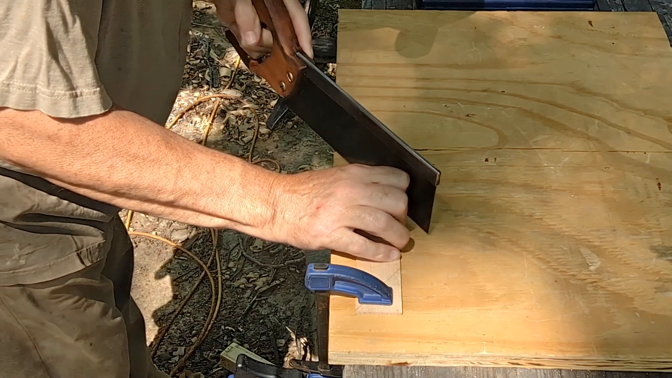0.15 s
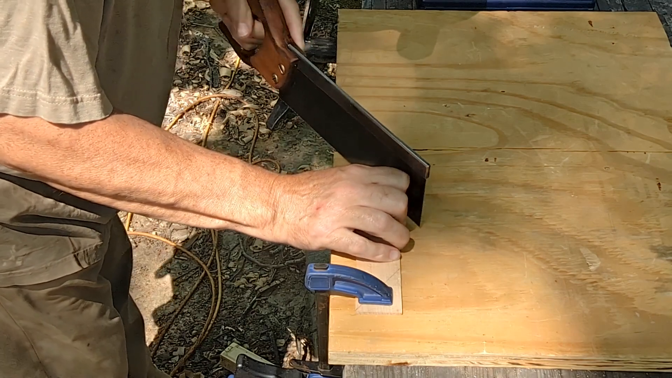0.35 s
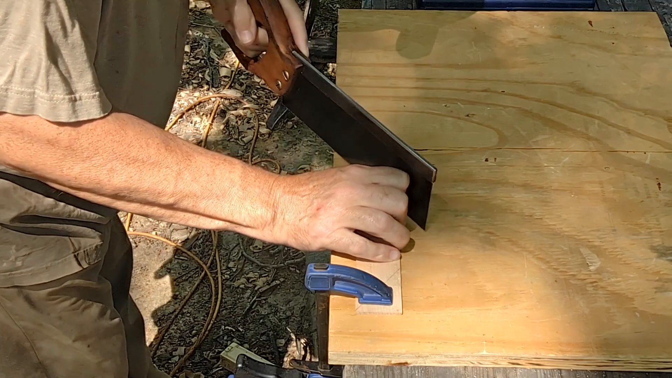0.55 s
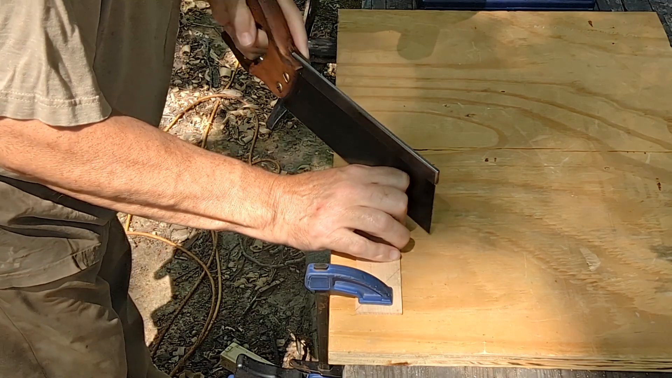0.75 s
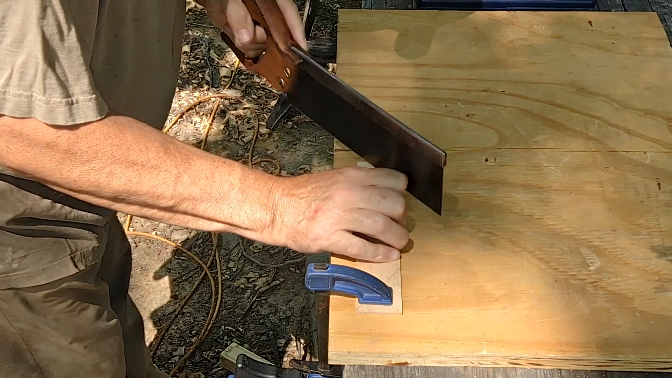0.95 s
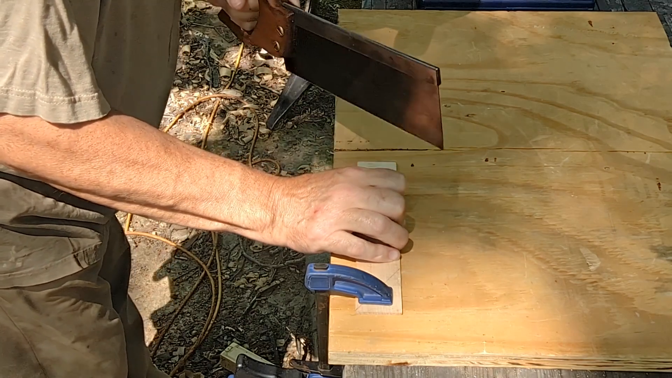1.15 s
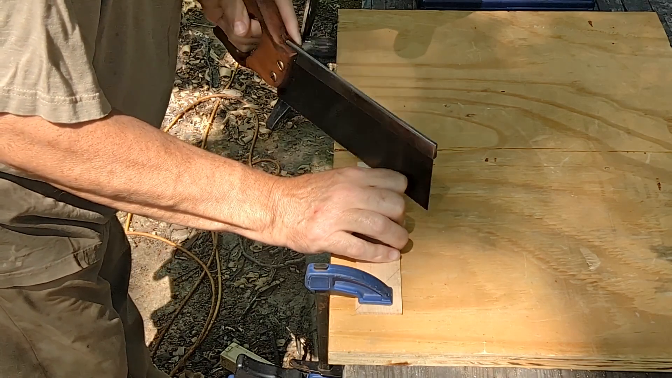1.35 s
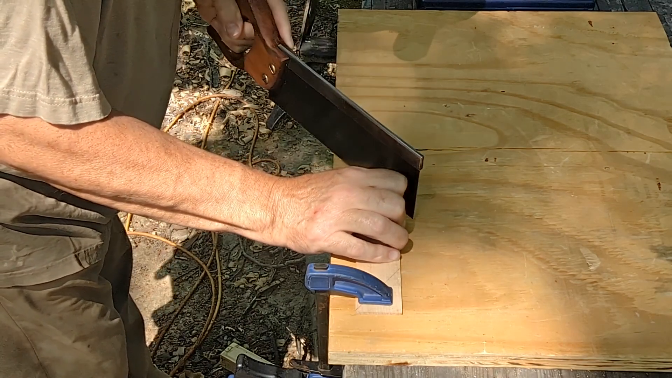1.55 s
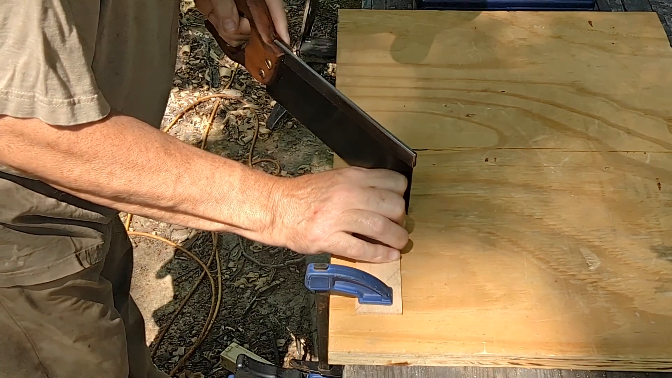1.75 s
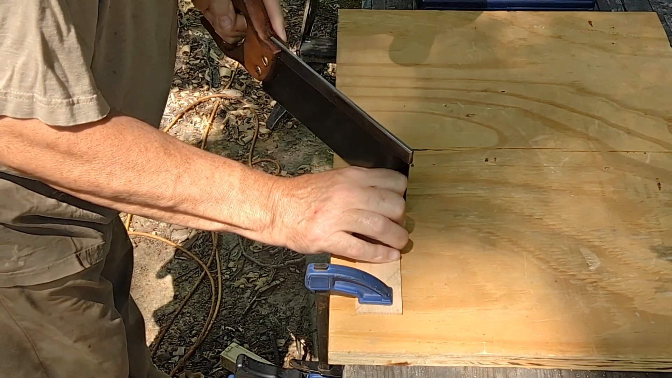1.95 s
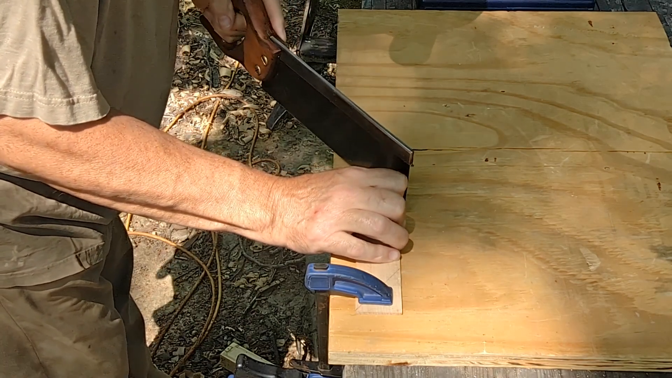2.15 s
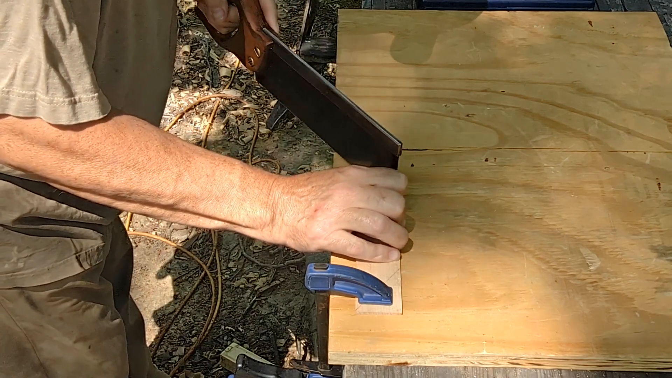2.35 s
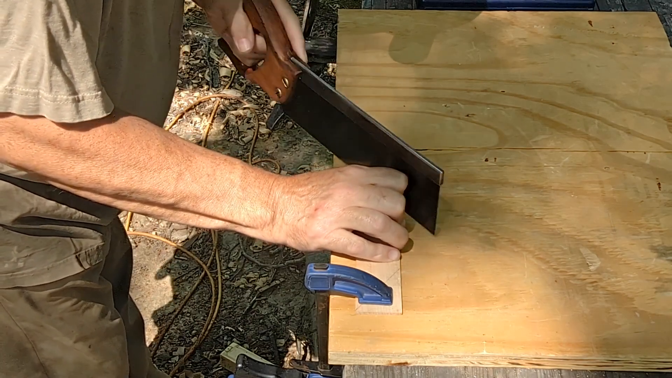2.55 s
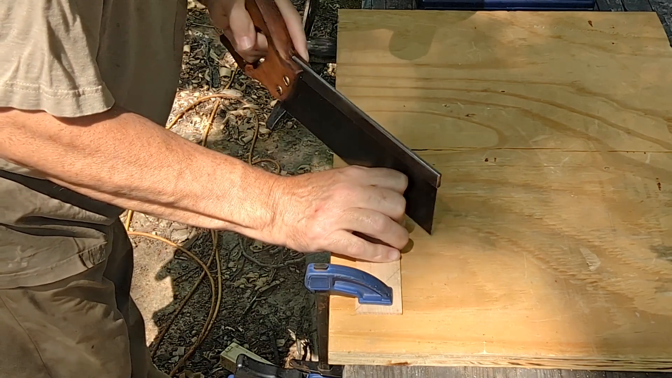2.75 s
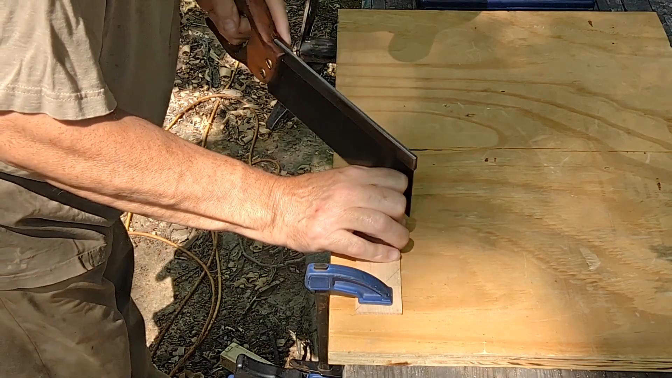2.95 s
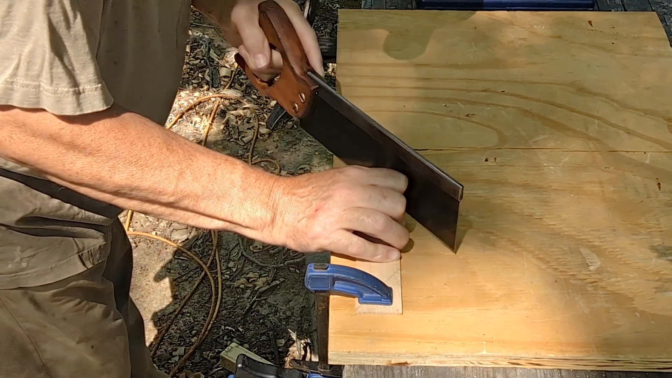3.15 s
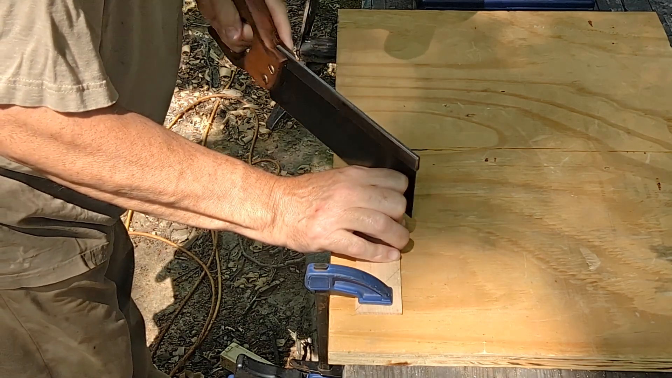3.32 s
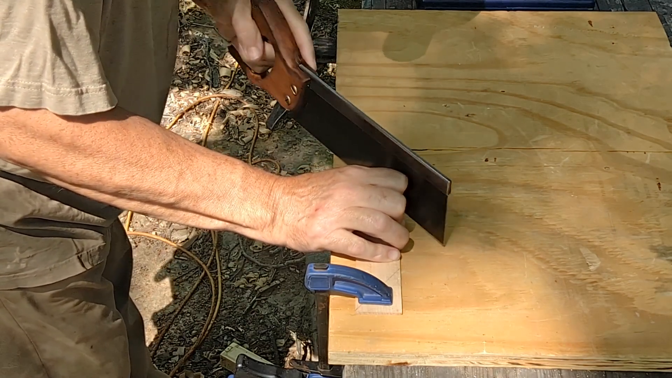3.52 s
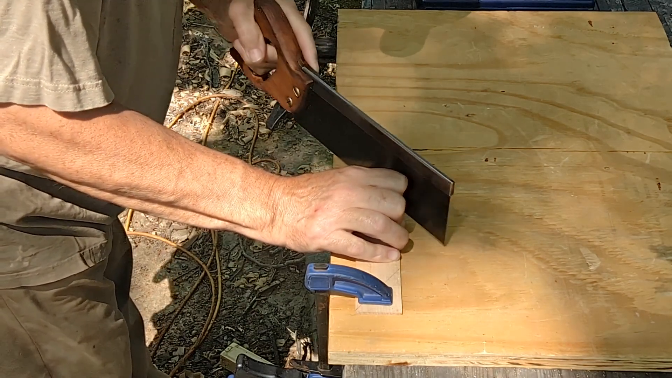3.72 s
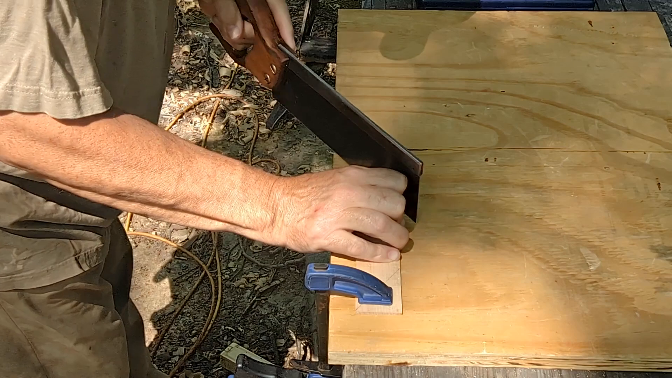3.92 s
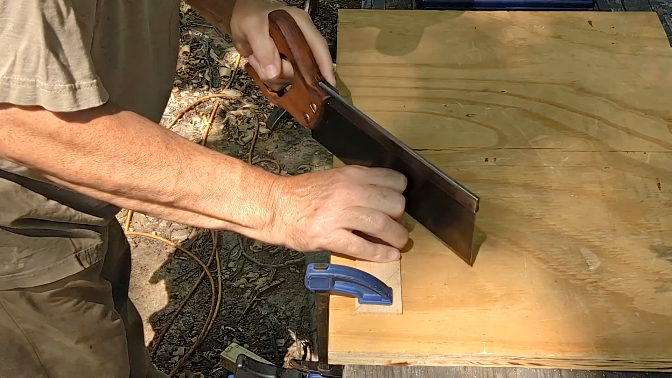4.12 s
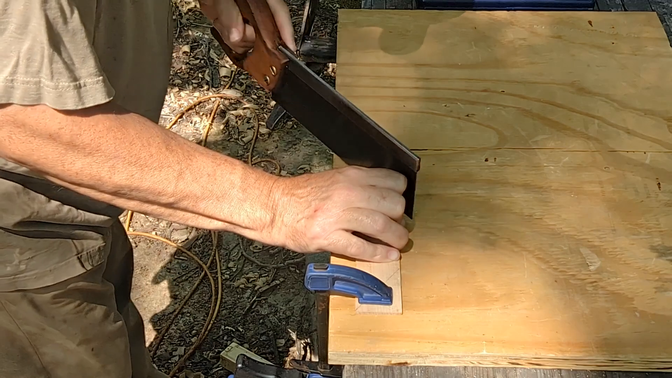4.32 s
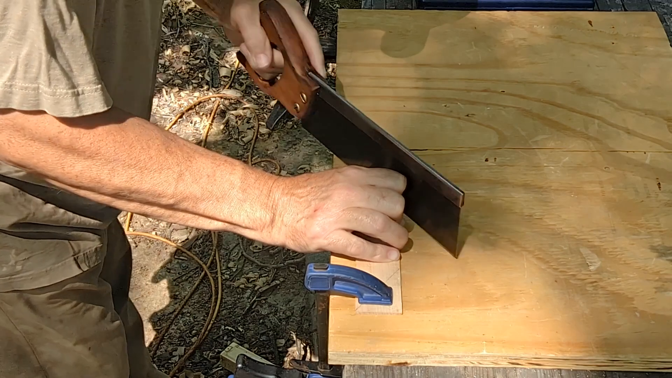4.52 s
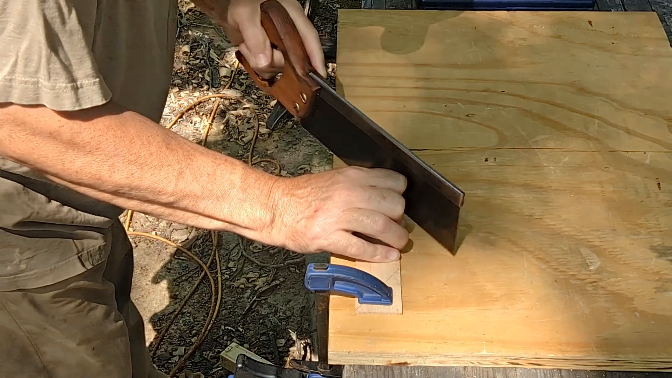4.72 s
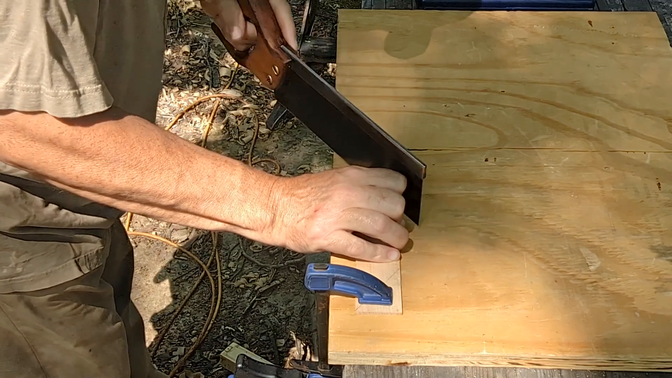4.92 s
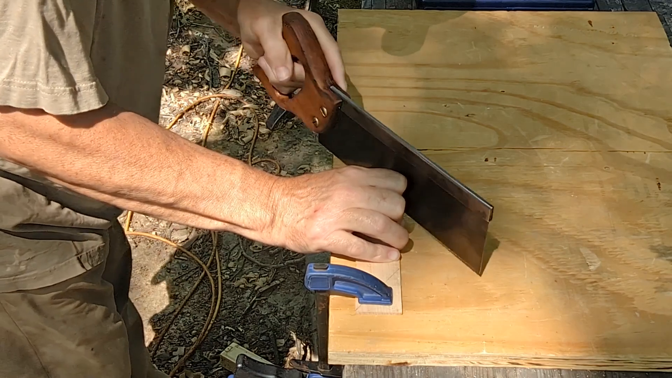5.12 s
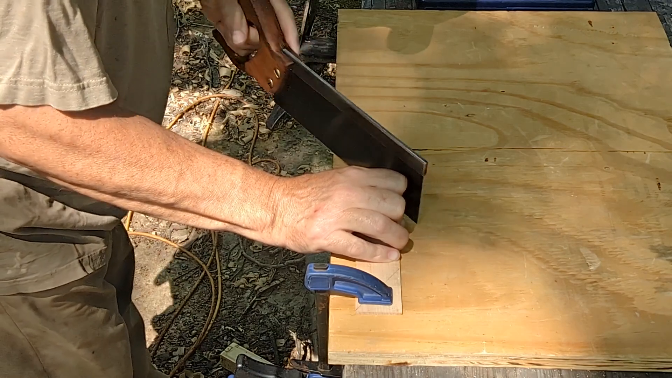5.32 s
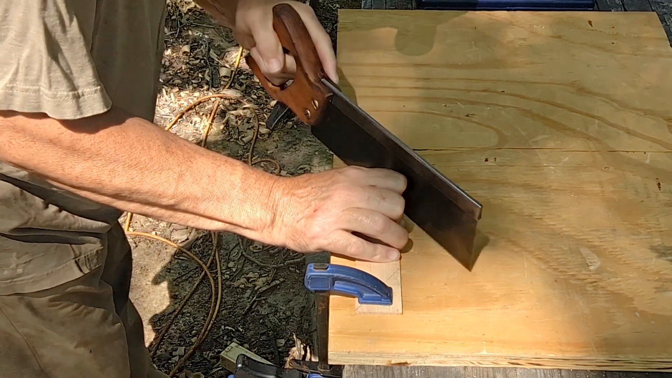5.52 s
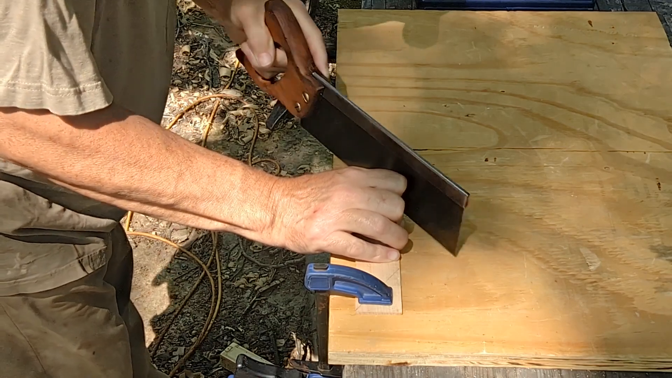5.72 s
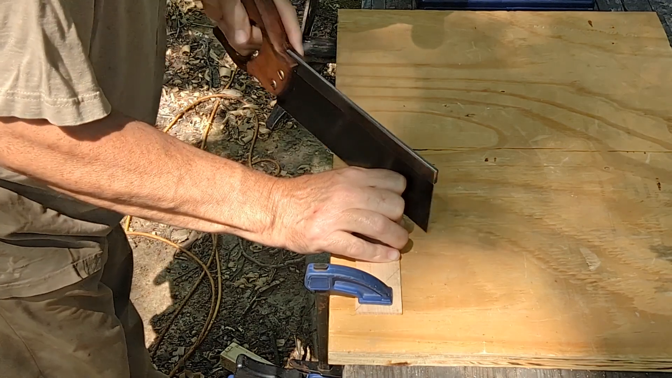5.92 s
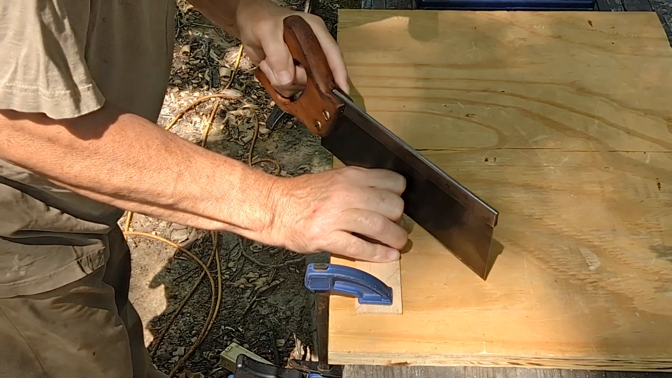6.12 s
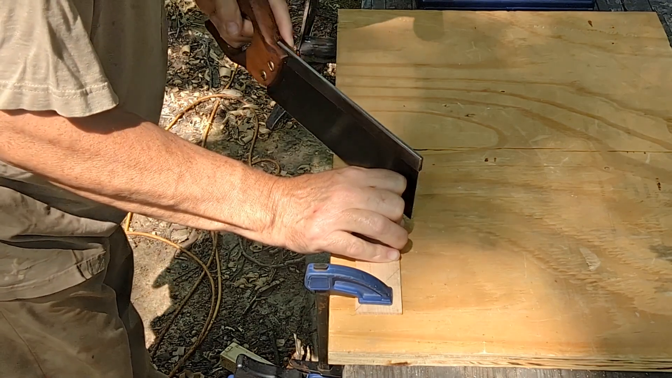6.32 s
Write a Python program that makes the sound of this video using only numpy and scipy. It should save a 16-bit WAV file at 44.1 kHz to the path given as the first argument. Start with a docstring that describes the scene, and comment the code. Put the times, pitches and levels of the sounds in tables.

```python
"""A fine-toothed back saw cuts a thin strip of wood clamped to a plywood bench, outdoors.
Its teeth catch and tear fibres at the pace of the arm, and this force drives the resonances of strip,
bench and blade, harder on the push than on the pull, close to a two-port microphone.
In a pause the saw is set back with a few knocks. Behind it a cicada swells, a bird whistles and
something rumbles far off, under an open-air hush."""
import sys
import numpy as np
from scipy import signal
from scipy.fft import rfft, irfft, next_fast_len
from scipy.io import wavfile
from scipy.ndimage import uniform_filter1d

SR = 44100
rng = np.random.default_rng(int(sys.argv[2]) if len(sys.argv) > 2 else 0)


def dump(signal):
    """Clip the signal to [-1, 1] and save it as 16-bit WAV at the path in sys.argv[1]."""
    limited = np.clip(np.atleast_2d(signal).T, -1, 1)
    pcm = np.round(limited * 32767).astype(np.int16)
    wavfile.write(sys.argv[1], SR, pcm)


N = 280917
T = np.arange(N) / SR
FFT_SIZE = 2 * next_fast_len(N // 2 + SR // 4)
HZ = np.arange(FFT_SIZE // 2 + 1) * SR / FFT_SIZE

# Forward and return strokes. Each row: start and end in seconds, point of greatest effort from 0 to 1,
# bite in dB, then low notes, blade rasp and tooth hiss in dB relative to the bite, bench shudder in dB.
PUSHES = [(-0.053, 0.141, 0.53, -41.0, -0.5, 1, -4.5, -41.5),
          (0.281, 0.513, 0.61, -37.0, -4.5, -0.5, -6.5, -39.5),
          (0.671, 0.891, 0.57, -32.5, -5.5, -3, -7.5, -36),
          (2.399, 2.694, 0.66, -34.0, -4.0, 0.5, -5.5, -45.5),
          (2.923, 3.2, 0.5, -31.5, -5, -1.5, -6, -41.5), (3.395, 3.691, 0.47, -32.5, -2.5, -1, -5.5, -43),
          (3.911, 4.191, 0.38, -31.0, -2, 0, -3, -47.5), (4.396, 4.691, 0.45, -31.5, -4.5, -0.5, -3, -44),
          (4.905, 5.196, 0.44, -29, -2, -1, -3.5, -43.5), (5.395, 5.682, 0.52, -30, -3.5, -0.5, -3, -41.5),
          (5.889, 6.176, 0.5, -29.0, -4, -1.5, -3.5, -43.5)]
PULLS = [(0.108, 0.335, 0.49, -44, 1.5, -1, -7, -41.5), (0.496, 0.722, 0.39, -41.5, 1, -1.5, -7.5, -36),
         (2.207, 2.387, 0.49, -52.5, 1.5, -3.5, -8, -51.5), (2.703, 2.975, 0.37, -43, 3.5, 2, -6, -40.5),
         (3.188, 3.448, 0.45, -38.5, 1, 2.0, -7, -58), (3.691, 3.94, 0.4, -39.5, -1, 4, -3, -49),
         (4.161, 4.464, 0.43, -38.5, -2, 2.0, -3, -46.5), (4.673, 4.956, 0.44, -38, -4, 2.0, -2.5, -46),
         (5.169, 5.446, 0.53, -37.5, -2, 4, -1.5, -45), (5.653, 5.936, 0.52, -37.0, -5, 4, -0.5, -40.5),
         (6.127, 6.432, 0.47, -35.5, -1, 1.5, -2.5, -39.5)]
# Teeth snagging on hard grain. Each row: time in seconds, half length in seconds, extra bite in dB.
SNAGS = [(0.411, .012, 4), (0.8, 0.012, 4), (2.534, 0.0018, 3.5), (2.601, 0.021, 4.5), (3.07, .03, 1.5),
         (3.377, 0.011, 3), (3.773, 0.0094, 3), (4.09, 0.017, 4), (4.223, .002, 3), (5.112, 0.014, 3.5),
         (5.333, .002, 5.5), (5.596, 0.015, 2), (5.98, .002, 3), (6.087, .014, 1)]
# Modes of strip, bench and blade. Each row: frequency in Hz, bandwidth in Hz, peak height in dB.
MODES = [(272.8, 27.6, 10.5), (437.6, 40, 10), (544.8, 50.5, 10.5), (651.3, 46, 9.5), (820, 73, 6.5),
         (1143, 130, 7.5), (1291, 63, 8), (1380, 42, 3.5), (1507, 35, 3.5), (1664, 50, 5), (1900, 40, 0.5),
         (3140, 1400, 3.5), (3670, 140, 1), (6730, 410, 5), (9500, 480, 3.5), (11700, 430, 3),
         (12450, 370, 2)]
# Spectral envelopes of the sawing. Each row: frequency in Hz, relative level in dB.
PUSH_SPECTRUM = [(90, -33), (170, -11.5), (350, -3.5), (750, -1), (960, -5), (1450, -1), (2000, -1),
                 (2500, -5.5), (3200, -23.5), (6000, -27), (15000, -69)]
PULL_SPECTRUM = [(90, -9.5), (170, -15.5), (350, -2.5), (750, 1), (960, -1.5), (1450, 0.5), (2000, 0.5),
                 (2500, -15.5), (3200, -19), (6000, -34), (15000, -49)]
RASP_SPECTRUM = [(500, -72), (1700, -11.5), (2300, -1), (2700, -4), (3300, 4.5), (4000, 3.5), (4500, -5),
                 (5300, -16.5), (8000, -25), (15000, -57.5)]
HISS_SPECTRUM = [(2500, -44.5), (4800, -4.5), (6000, 2.5), (8000, 3.5), (10500, 3.5), (12700, 6.5),
                 (14000, -3), (16000, 1)]
SHUDDER_SPECTRUM = [(25, -60), (45, -17), (65, -15), (85, -0.5), (115, 1), (150, -13), (210, -9.5),
                    (290, -16.5), (400, -19), (1000, -64)]
# Likeness of the tearing at the two ports. Each row: frequency in Hz, shared power from 0 to 1.
COHERENCE = [(200, 0.5), (500, 0.97), (1300, 0.53), (2100, 0.18), (3300, 1), (4300, 0.24), (5200, 0.5),
             (6600, 0.56), (8500, 0.4), (12000, .5), (15000, 0)]
# Balance of the saw between the ports. Each row: frequency in Hz, left minus right in dB.
BALANCE = [(100, -0.9), (270, 0), (480, -1), (1000, 1), (1900, 1.5), (2850, -1.5), (3400, 1.5), (6000, 1),
           (9600, -5), (12000, 5), (13700, 4), (16000, 2)]
# The saw set down on the wood. Each row: time in seconds, relative peak force in dB.
KNOCKS = [(1.589, -43.5), (1.616, -42.5), (1.639, -50), (1.898, -44.5)]
# Cicada swells. Each row: time of the crest in seconds, level in dB.
SWELLS = [(.62, -48), (2.1, -48), (3.42, -49.5), (4.85, -48.5), (6.25, -50)]
# Bird whistles. Each row: start and end in seconds, first and last frequency in Hz, level in dB.
WHISTLES = [(1.96, 2.07, 2735, 2750, -61), (2.08, 2.18, 2755, 2725, -63), (2.04, 2.22, 1840, 1760, -72)]
# Spectral envelopes of the lesser sources. Each row: frequency in Hz, relative level in dB.
KNOCK_SPECTRUM = [(60, -24), (115, 17), (200, 2), (290, 0), (450, -8), (700, 4), (1300, -5), (2500, -17),
                  (3400, -4), (6000, -25), (15000, -40)]
CICADA_SPECTRUM = [(2500, -30), (3300, -15), (3650, -1), (3900, -5), (4250, 1.5), (4750, -1.5), (5250, 1.5),
                   (6100, -7.5), (6950, 1.5), (7700, -9.5), (8800, -10), (10000, -23), (15000, -31)]
HUSH_SPECTRUM = [(60, -6.5), (150, 6.5), (230, -7.5), (300, -1), (550, -5), (1100, -3), (1900, -10.5),
                 (2700, -9), (3600, -5.5), (7000, -5.5), (8500, -14), (13500, -14), (15500, -9)]
RUMBLE_SPECTRUM = [(20, -60), (30, -41), (40, -35), (50, -23), (60, 0.5), (76, -2), (103, 0.5), (130, -12),
                   (190, -23.5), (400, -46.5)]


def saw(motion, spectrum, lift_db, dull_db, bite_db, rasp_db, hiss_db, shudder_db, **cut):
    """Forced vibration: the cutting force drives the modes of wood, blade and tooth tips."""
    progress, lows_db, (bite, rasp, hiss, shudder) = motion
    tearing, zipping = cutting_force(progress, **cut)
    modes_db = sum(db / (1 + (2 * (HZ - hz) / width) ** 2) for hz, width, db in MODES)
    # sawdust fills the gullets, so each stroke ends duller than it starts
    shelf_db = lift_db + lows_db + dull_db * (progress - .5)
    dulled = tearing + (undb(shelf_db) - 1) * weigh(tearing, 1 / (1 + (HZ / 900) ** 4))
    wood = colour((dulled + zipping) * bite, contour(spectrum) + modes_db)
    blade = colour(tearing * rasp, contour(RASP_SPECTRUM) + modes_db)
    tips = colour(tearing * hiss, contour(HISS_SPECTRUM) + modes_db)
    bench = bench_shudder(shudder)
    return undb(bite_db) * wood + undb(rasp_db) * blade + undb(hiss_db) * tips + undb(shudder_db) * bench


def arm(strokes, bite_power, let_go_db, slow_lows_db, hiss_fade_db, shudder_at, shudder_rise_db):
    """Amplitude modulation: the arm's effort rises and falls once a stroke and sets the saw's gains."""
    saturation, grip_db, dig_in_db, sway_db = 0.91, 1.46, 4.5, 0.64
    progress, lows_db, gains = np.zeros(N), np.zeros(N), np.zeros((4, N))
    for start, end, crest, bite_db, low_db, rasp_db, hiss_db, shudder_db in strokes:
        on = (T > start) & (T < end)
        progress[on] = way = (T[on] - start) / (end - start)
        effort = np.sin(np.pi * np.interp(way, [0, crest, 1], [0, .5, 1]))
        pressure = (np.tanh(saturation * effort) / np.tanh(saturation)) ** bite_power
        # the braking teeth grip a little harder and lose treble as they dig in, then let go
        release = np.clip(10 * (way - 0.744), 0, 1)
        bite = pressure * undb(bite_db + grip_db * braking(way) - let_go_db * release)
        treble = bite * undb(-dig_in_db * braking(way))
        hiss = treble * undb(hiss_db - hiss_fade_db * (way - .5))
        lows_db[on] = low_db + slow_lows_db * (1 - effort)  # a slow blade sounds deeper
        # the bench shakes most while the blade's tip is in the cut: earlier on a push than on a pull
        shaking = np.exp(-((way - shudder_at) / 0.22) ** 2)
        shudder = effort ** .75 * undb(shudder_db + shudder_rise_db * (shaking - 1))
        gains[:, on] += [bite, treble * undb(rasp_db), hiss, shudder]
    return progress, lows_db, gains * undb(sway_db * wander(20))  # the hand is unsteady


def braking(progress):
    """Deceleration of the arm: 0 through most of a stroke, rising to 1 near its end."""
    return np.clip((progress - .65) / .15, 0, 1)


def cutting_force(progress, peak_tooth_hz, tooth_db, zip_db, grunt_db, grain_db):
    """Impact and fracture: teeth and fibres give a tearing noise, the tooth rate a rough tonal zip."""
    settled = np.interp(T, [1, 2], [0, 1])  # 0 before the pause, 1 after it
    speed = (.1 + .9 * np.sin(np.pi * progress) ** 2) * (.95 + .05 * settled)
    clicks, phase = teeth(peak_tooth_hz * speed, scatter_db=17)
    snaps = np.array([fibres(phase, per_s=16000, scatter_db=4.5, decay=0.21) for _ in range(3)])
    snags_db = sum(db * np.exp(-((T - at) / half_s) ** 2) for at, half_s, db in SNAGS)
    grain = unit(undb(grain_db * np.tanh(wander(260)) + 0.83 * wander(45) + snags_db))
    catching = undb(tooth_db) * (clicks - uniform_filter1d(clicks, size=256))
    shared, apart = unit(catching + snaps[0]), snaps[1:]
    # before the pause the saw sits elsewhere and sounds wider between the two ports
    before_pause = two_ports(shared, apart, contour([(300, 0.82), (500, 0.9), (1500, 0.38)]))
    after_pause = two_ports(shared, apart, contour(COHERENCE))
    tearing = settled * after_pause + (1 - settled) * before_pause
    # the force rises and falls once a tooth; as the blade slows, teeth dig in and the zip falls to a grunt
    zipping = undb(zip_db + grunt_db * braking(progress) + 2 * wander(120)) * np.cos(2 * np.pi * phase)
    return tearing * grain, zipping * grain


def teeth(tooth_hz, scatter_db):
    """A jittered impulse train: one click of random strength per tooth, and the phase between teeth."""
    jitter = .15 * wander(1100) + .07 * wander(60)
    passed = np.cumsum(tooth_hz * np.exp(jitter)) / SR
    at = np.flatnonzero(np.diff(np.floor(passed)))
    clicks = np.zeros(N)
    clicks[at] = undb(scatter_db * (2 * rng.random(N) - 1)[at]) * np.sqrt(SR / tooth_hz[at])
    return unit(clicks), passed % 1


def fibres(phase, per_s, scatter_db, decay):
    """Shot noise: wood fibres snap at random, most strongly just after each tooth catches."""
    snaps = (rng.random(N) < per_s / SR) * rng.choice([-1, 1], N)
    strength = undb(scatter_db * rng.uniform(-1.06, 1, N))
    return unit(snaps * strength * np.exp(-phase * decay))


def bench_shudder(envelope):
    """Frictional excitation: a drag of wandering rate shakes the bench as strongly as the stroke sets."""
    noise = colour(rng.standard_normal(N), contour(SHUDDER_SPECTRUM))
    phase = np.angle(signal.hilbert(noise, FFT_SIZE)[:N])
    drag = unit(np.cos(phase))
    response_db = contour([(25, -50), (48, -5), (75, 0.5), (280, 1.5), (600, 6), (2000, -70)])
    return weigh(drag * envelope, undb(response_db))


def blade_ring(x, t60_s):
    """Free decay: the blade's many close modes add a brief bright ring after every catch."""
    t = T[:SR // 10]
    ringing = diffuse(x, undb(-60 * t / t60_s))
    share = .22 * (1 - 1 / (1 + (HZ / 2000) ** 4))  # fraction of the power that rings on
    return weigh(x, np.sqrt(1 - share)) + weigh(ringing, np.sqrt(share))


def knocks(gain_db, decay_s):
    """Impact excitation: each tap of the blade sends a short scuff into strip and bench."""
    force = sum(undb(db) * (T >= at) * np.exp(-np.abs(T - at) / decay_s) for at, db in KNOCKS)
    return undb(gain_db) * colour(force * rng.standard_normal(N), contour(KNOCK_SPECTRUM))


def direct_paths(x, lag_s):
    """Time and level differences: the saw reaches the left port later, with a balance set by band."""
    balance_db = contour(BALANCE)
    left = undb(balance_db / 2) * np.exp(-2j * np.pi * HZ * lag_s)
    right = undb(-balance_db / 2)
    return weigh(x, np.array([left, right]))


def reflections(x, gain_db, t60_s):
    """Scattering: the ground and things nearby return a faint, dull tail."""
    t = T[:SR // 2]
    scattered = diffuse(x, undb(-60 * t / t60_s) * (t > .006))
    return undb(gain_db) * weigh(scattered, 1 / (1 + (HZ / 5000) ** 2))


def cicada(rise_s, fall_s, flutter_db, pulse_hz, whine_db, lead_s):
    """Amplitude-modulated noise: two narrow whining bands lead each swell of a broad, pulsing buzz."""
    swell = sum(undb(db) * np.exp(-((T - at) / np.where(T < at, rise_s, fall_s)) ** 2)
                for at, db in SWELLS)
    pulses = np.cumsum(pulse_hz * (1 + 0.062 * wander(30))) / SR
    pulsing = undb(flutter_db * np.sin(2 * np.pi * pulses))
    buzz = unit(colour(rng.standard_normal((2, N)), contour(CICADA_SPECTRUM)))
    bands = sum(np.exp(-((HZ - hz) / 75) ** 2) for hz in (4370, 5280))
    whine = unit(weigh(rng.standard_normal((2, N)), bands))
    early_swell = np.interp(T + lead_s, T, swell)
    return swell * buzz * np.sqrt(pulsing) + undb(whine_db) * early_swell * whine * pulsing


def bird():
    """Frequency modulation: each thin, far whistle is a pure tone that glides and wavers a little."""
    out = np.zeros((2, N))
    for start, end, first_hz, last_hz, db in WHISTLES:
        progress = np.clip((T - start) / (end - start), 0, 1)
        hz = (first_hz + (last_hz - first_hz) * progress) * (1 + .004 * wander(150))
        fading = undb(2 * np.array([wander(37.2), wander(39.2)]))
        envelope = np.sqrt(np.abs(np.sin(np.pi * progress)))
        out += undb(db) * fading * envelope * np.sin(2 * np.pi * np.cumsum(hz) / SR)
    return out


def open_air(hush_db, rumble_db):
    """Ambient noise: a hush with an insect chorus, coherent mainly in the bass, over a distant rumble."""
    noise = rng.standard_normal((4, N))
    air = two_ports(noise[0], noise[1:3], contour([(150, 0.6), (500, 0.7), (1500, 0.028)]))
    hush = unit(colour(air, contour(HUSH_SPECTRUM))) * undb(hush_db + .5 * wander(9.9))
    rumble = unit(colour(noise[3], contour(RUMBLE_SPECTRUM))) * undb(rumble_db + wander(4.42))
    return hush + rumble


def two_ports(shared, apart, coherence):
    """Partial coherence: one common sound mixes with two independent ones, band by band."""
    return weigh(shared, np.sqrt(coherence)) + weigh(apart, np.sqrt(1 - coherence))


def diffuse(x, envelope):
    """Convolution with a noise tail of the given envelope and unit energy, one for each port."""
    tail = rng.standard_normal((2, len(envelope))) * envelope
    tail /= np.sqrt(np.sum(tail ** 2, axis=1, keepdims=True))
    return signal.fftconvolve(x, tail, axes=1)[:, :N]


def colour(x, db):
    """Minimum-phase filtering: peaks ring after a blow, and white noise keeps its power."""
    cepstrum = irfft(db * np.log(10) / 20)
    response = np.exp(rfft(2 * cepstrum[:FFT_SIZE // 2], FFT_SIZE))
    return weigh(x, response / np.sqrt(np.mean(np.abs(response) ** 2)))


def weigh(x, gain):
    """Linear filtering by a gain per frequency."""
    return irfft(rfft(x, FFT_SIZE) * gain, FFT_SIZE)[..., :N]


def contour(points):
    """Interpolation of (Hz, value) points on a log-frequency axis."""
    hz, value = np.transpose(points)
    return np.interp(np.log(HZ + 1), np.log(hz), value)


def wander(per_s):
    """Random fluctuation: per_s levels a second, smoothed twice and scaled to rms 1."""
    hold = int(SR / per_s)
    held = np.repeat(rng.standard_normal(N // hold + 1), hold)
    return unit(uniform_filter1d(uniform_filter1d(held, hold), hold)[:N])


def unit(x):
    """Normalisation to rms 1."""
    return x / np.sqrt(np.mean(x ** 2))


def undb(db):
    """Amplitude ratio of a level in decibels."""
    return 10 ** (np.asarray(db) / 20)


def scene():
    """Superposition: steep pushes, more even pulls and knocks add to their echoes and the background."""
    pushing = arm(PUSHES, bite_power=3.94, let_go_db=5.5, slow_lows_db=6.0, hiss_fade_db=-2.5,
                  shudder_at=0.46, shudder_rise_db=6.0)
    pulling = arm(PULLS, bite_power=3.23, let_go_db=5, slow_lows_db=1.5, hiss_fade_db=2.5,
                  shudder_at=0.61, shudder_rise_db=17.5)
    push = saw(pushing, PUSH_SPECTRUM, lift_db=4.5, dull_db=1.5,
               bite_db=-0.76, rasp_db=0.57, hiss_db=2.0, shudder_db=1.3,
               peak_tooth_hz=1430, tooth_db=-9, zip_db=-11.5, grunt_db=0.5, grain_db=2.2)
    pull = saw(pulling, PULL_SPECTRUM, lift_db=2.0, dull_db=5.5,
               bite_db=1.0, rasp_db=2.7, hiss_db=2.2, shudder_db=1.8,
               peak_tooth_hz=1250, tooth_db=-10, zip_db=-21, grunt_db=8, grain_db=3)
    at_bench = blade_ring(push + pull, t60_s=.06) + knocks(gain_db=-2, decay_s=0.01)
    near = direct_paths(at_bench, lag_s=7.5e-5)
    buzz = cicada(rise_s=.3, fall_s=.15, flutter_db=3.2, pulse_hz=55, whine_db=-7.5, lead_s=.13)
    far = buzz + bird() + open_air(hush_db=-56, rumble_db=-52.5)
    return near + reflections(near, gain_db=-22.0, t60_s=0.34) + far


def record(dry):
    """Band limiting: a steep elliptic low-pass cuts the treble above 15850 Hz."""
    return signal.sosfilt(signal.ellip(12, .2, 80, 15850, fs=SR, output="sos"), dry)


dry = scene()
out = record(dry)
dump(out)
```